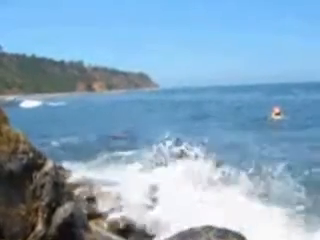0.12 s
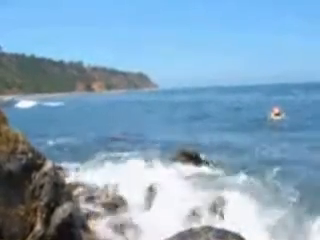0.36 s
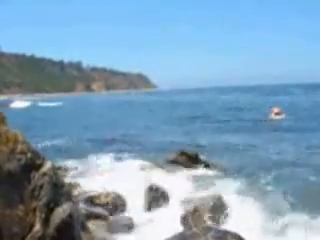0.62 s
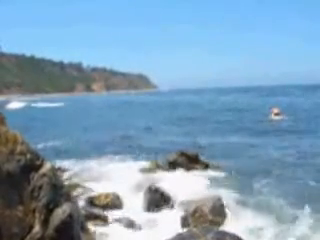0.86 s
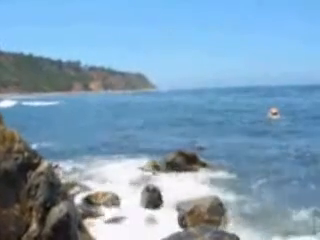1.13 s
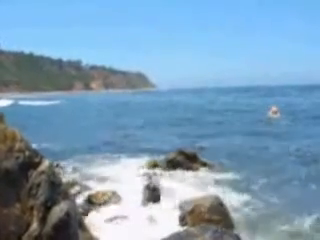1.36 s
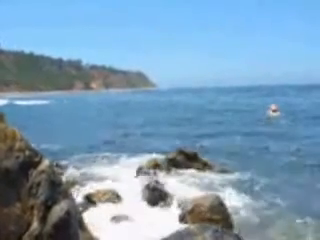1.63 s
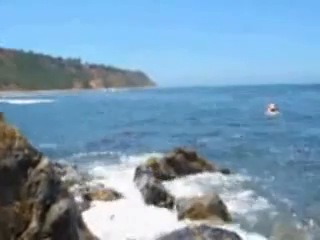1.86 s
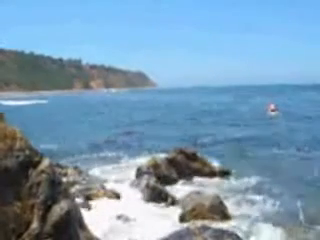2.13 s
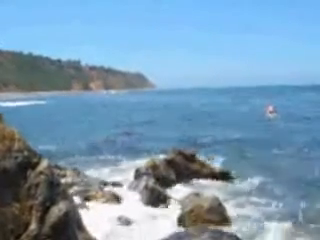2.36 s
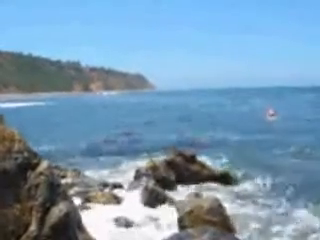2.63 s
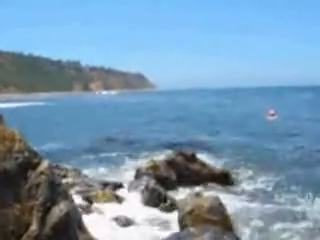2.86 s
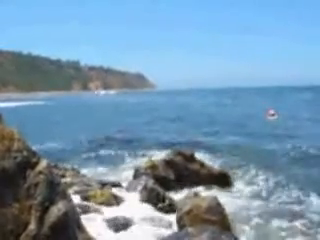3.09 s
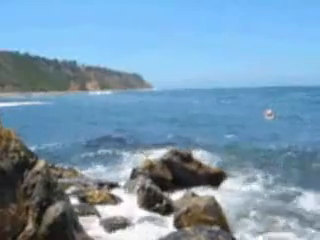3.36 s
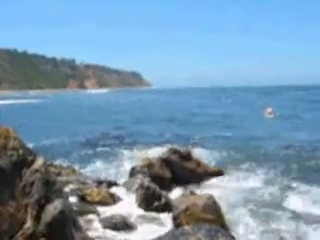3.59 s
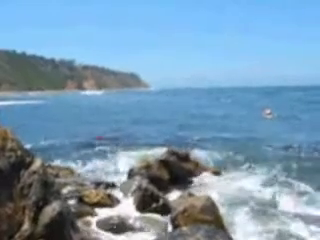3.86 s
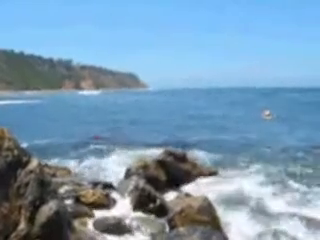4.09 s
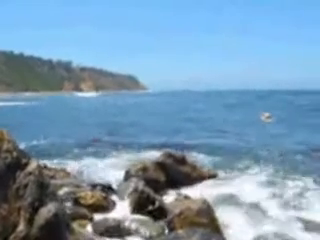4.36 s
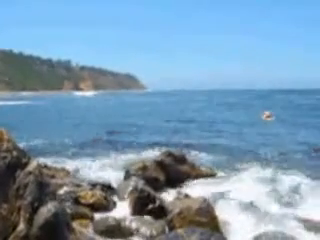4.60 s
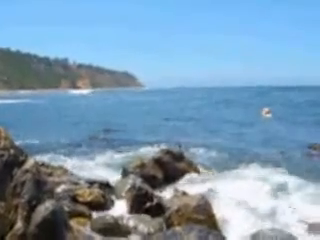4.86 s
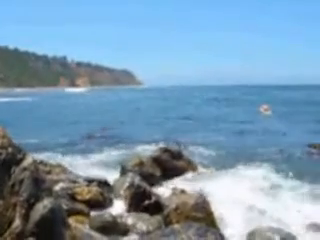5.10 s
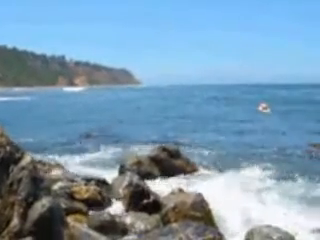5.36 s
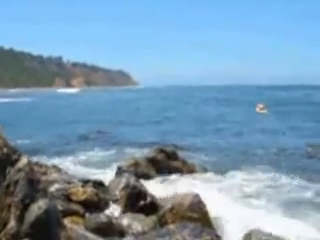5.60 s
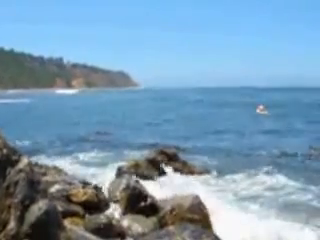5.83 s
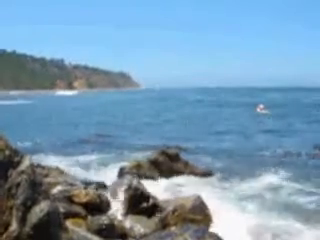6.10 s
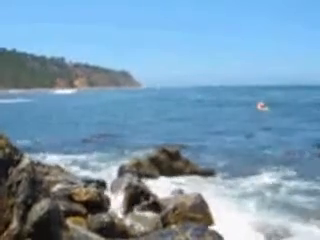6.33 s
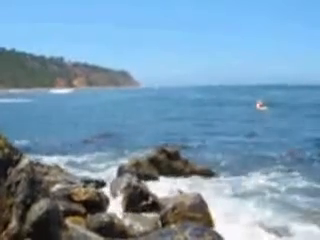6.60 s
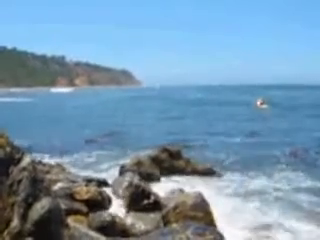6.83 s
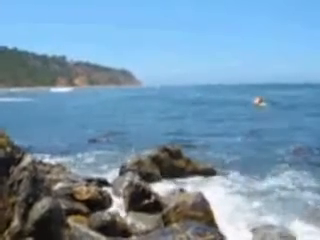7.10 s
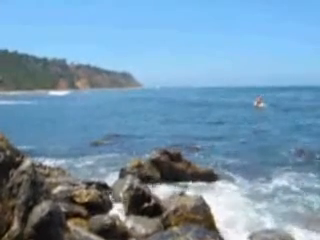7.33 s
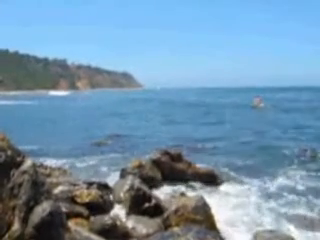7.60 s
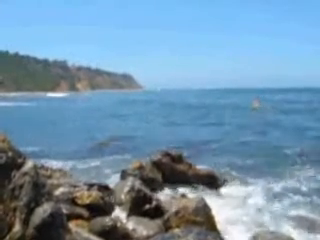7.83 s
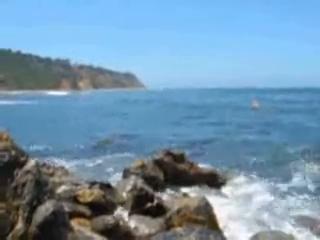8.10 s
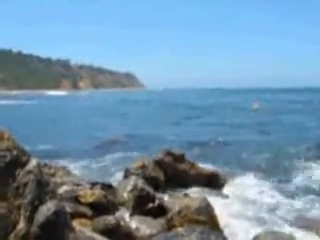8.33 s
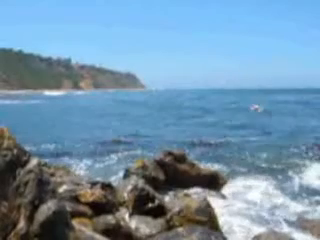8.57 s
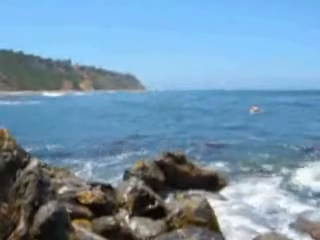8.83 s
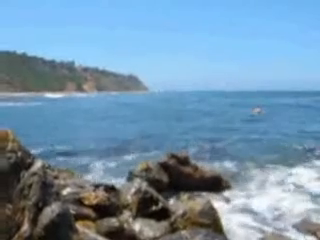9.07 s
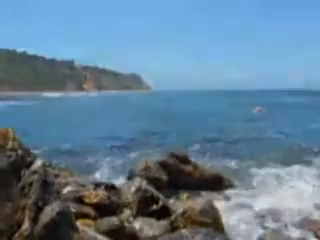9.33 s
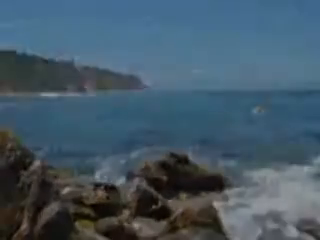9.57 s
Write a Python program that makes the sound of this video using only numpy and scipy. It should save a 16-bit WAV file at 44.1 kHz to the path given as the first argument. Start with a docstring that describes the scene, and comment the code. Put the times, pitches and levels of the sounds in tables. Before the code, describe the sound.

A wave is already crashing over rocks a few metres away, a dense continuous roar with deep rumble, thudding bubbles and bright spray strongest around 0.2 to 0.5 s. Low gulps of trapped air bubble through the first 1.7 s. At about 2.0 to 2.4 s a cluster of heavy, plunging gulps and wind thumps stands out, with the strongest buffets on the microphone. The wash then falls back, surging unevenly from 2.5 to 4.5 s with hollow slaps on rock, notably near 2.55 and 4.2 s. It thins around 5 s, gulps and swells briefly near 5.9 to 6.4 s, then is quietest around 6.7 to 7 s. From 7.5 s foam and roar gradually return, fuller near 8.6 s with soft gulps and little slaps, and keep washing to the end at about 9.7 s. Light wind flutters low throughout; mono, dull treble, faint hiss.

```python
"""Surf breaks over rocks a few metres away, runs in, drains and surges again: five clouds of ringing bubbles
make its thud, rumble, roar, foam and spray. Hollows and channels hum as filtered noise, and shaped low noise
is the light wind buffeting the microphone. Short swelling tones are gulps of trapped air and, at the lowest
pitches, thumps of wind on the microphone; short rings with noisy droplets are water slapping rock.
A small mono recorder bends the wave, cuts the top near 5.3 kHz, adds hiss, faint whine and drifting offset."""
import sys
import numpy as np
from scipy import signal
from scipy.fft import rfft, irfft, next_fast_len
from scipy.io import wavfile

SR = 44100
rng = np.random.default_rng(int(sys.argv[2]) if len(sys.argv) > 2 else 0)


def digitize_waveform(pressure):
    """Quantize a signal to 16-bit integers and store it at the path in sys.argv[1].

    Rows of a 2-D input are taken as channels; values are limited to [-1, 1].
    """
    field = np.atleast_2d(pressure).T
    bounded = np.clip(field, -1, 1)
    quanta = np.round(bounded * 32767).astype(np.int16)
    wavfile.write(sys.argv[1], SR, quanta)


def field_ratio(decibels):
    """Amplitude ratio for a level in dB (20 dB per decade); scalars and array-likes work."""
    return 10 ** (np.asarray(decibels, dtype=float) / 20)


N = 427769

# white water: (time [s], bubble roar level [dB], spray against the roar [dB])
WHITE_WATER = [(0.0, -27.5, -6.5), (0.19, -26.5, -6), (0.35, -26, -4.5), (.7, -27, -7), (1.0, -27.5, -8.5),
               (1.59, -27.5, -9), (2.13, -31.5, -8), (2.55, -30.5, -9), (2.8, -32, -6.5), (3.0, -32, -7.5),
               (3.2, -29, -9.5), (3.4, -30.5, -6.5), (3.62, -29, -7), (3.94, -30.5, -6), (4.32, -31, -6),
               (4.75, -33.5, -5), (5.2, -33.5, -5.5), (5.7, -33.5, -5), (5.97, -30, -8.5),
               (6.18, -34, -6.5), (6.4, -31, -9), (6.65, -37.5, -5), (6.9, -36, -7), (7.13, -37, -7.5),
               (7.7, -33.5, -8.5), (8.15, -33, -7), (8.4, -31.5, -6), (8.65, -29.5, -7),
               (8.95, -30.5, -8.5), (9.2, -31.5, -7), (9.7, -32.5, -7.5)]
# heave of the water below: (time [s], rumble level [dB], thud against the rumble [dB])
HEAVE = [(0.0, -28.5, -5), (.7, -28, -5), (1.6, -31, -7.5), (2.1, -32, -10), (2.6, -36, -4.5),
         (3.0, -33, -7), (3.3, -36.5, -9), (3.75, -33.5, -5), (4.1, -35, -7), (4.4, -35.5, -3.5),
         (4.95, -38, 0), (5.6, -36.5, -11), (5.9, -33.5, -12.5), (6.4, -36.5, -3), (6.85, -38, -7.5),
         (7.5, -38, -6.5), (8.0, -39, -5), (8.5, -36, -9.5), (9.0, -36, -12), (9.7, -39, -15)]
# bubble colours, big air pockets to fine spray: (frequency [Hz], density [dB per Hz])
THUD_COLOUR = [(53, -26), (85, -2), (105, 2.5), (135, 2), (200, -3), (260, -41), (440, -120)]
RUMBLE_COLOUR = [(120, -39), (200, -2), (237, 1.5), (312, 1), (366, -1), (450, -1.5), (580, -25.5),
                 (990, -120)]
ROAR_COLOUR = [(260, -35), (450, -1.5), (560, 0.5), (760, 0.5), (900, 0.5), (1080, -2), (1250, -6),
               (1420, -10.5), (1800, -33), (3080, -120)]
FOAM_COLOUR = [(820, -35), (1350, -1), (1770, -3), (2250, -2), (2550, -3), (2750, -4), (3000, -10.5),
               (3900, -37), (6600, -120)]
SPRAY_COLOUR = [(1760, -38), (3000, -2), (4600, -2.5), (5100, -6), (5500, -6.5), (5900, -2.5),
                (7020, -39.5), (11900, -120)]
# hollows among the rocks that the water sets humming:
# (frequency [Hz], width of one filter pass [Hz], mean level [dB], share of the rumble's swing [ratio])
HUMMING_HOLLOWS = [(174, 42, -40, 0.81), (240, 39, -43, 0.99), (373, 73, -41, 1.05)]
# rock channels ringing with the roar, low then high: (frequency [Hz], width of one filter pass [Hz])
ROCK_CHANNELS = [(766, 125), (2530, 330)]
# how strongly they ring: (time [s], low channel against the roar [dB], high channel against the roar [dB])
CHANNEL_LEVELS = [(0, -12.5, -22), (1, -11, -22), (2.2, -14, -20), (2.58, -8, -19), (2.85, -15, -19),
                  (3.17, -6.5, -19), (3.4, -13.5, -18.5), (3.65, -5.5, -19), (3.85, -14, -18),
                  (4.3, -10, -18), (5, -11, -16.5), (6, -9.5, -15.5), (7, -12.5, -16.5), (8.2, -12, -14),
                  (8.6, -9.5, -12.5), (8.9, -9, -13.5), (9.1, -12, -15.5), (9.35, -8.5, -14.5),
                  (9.7, -12, -15)]
# breeze on the microphone: (time [s], level [dB])
BREEZE_LEVELS = [(0, -42), (.6, -38), (1.1, -40.5), (1.5, -42.5), (1.75, -42), (2.4, -38), (3.1, -44),
                 (3.7, -40), (4.3, -39), (5.2, -40.5), (5.8, -43.5), (6.4, -43), (6.9, -46.5), (7.6, -40),
                 (8.5, -44), (9.2, -40.5), (9.7, -47)]
# colour of the breeze: (frequency [Hz], density [dB per Hz])
BREEZE_COLOUR = [(13, -31), (22, -6), (32, 0), (60, 1.5), (90, -2.5), (130, -13), (200, -48.5), (300, -120)]
# strong buffets of wind: (time [s], level at the crest [dB], length scale of the rise [s])
WIND_BUFFETS = [(.54, -44, 0.054), (1.7, -36.5, .07), (2.05, -30, 0.1), (2.369, -28, 0.05),
                (2.493, -37, .04), (3.297, -39, 0.07), (3.903, -32.5, .06), (4.077, -34, 0.049),
                (4.45, -34, 0.08), (4.7, -41.5, .1), (5.465, -37, 0.039), (6.407, -39.5, 0.07),
                (7.907, -42, .07), (9.2, -41, .1)]
# colour of a buffet, darker than the breeze: (frequency [Hz], density [dB per Hz])
BUFFET_COLOUR = [(13, -25), (25, -4), (45, -1), (70, -4), (100, -6.5), (140, -29), (250, -120)]
# gulps of trapped air, and in the lowest rows short thumps of wind on the microphone:
# (time of the crest [s], peak level [dB], pitch [Hz], length of the rise [s])
GULPS_AND_THUMPS = [(0.219, -20.5, 223, 0.042), (.265, -25, 168, 0.051), (.46, -20, 218, 0.045),
                    (0.549, -20.5, 385, .04), (.65, -25.5, 173, 0.066), (1.079, -24.5, 250, 0.036),
                    (1.18, -27, 176, 0.045), (1.35, -21, 187, 0.027), (8.326, -29.5, 270, 0.046),
                    (8.462, -26.5, 227, 0.047), (8.848, -28.5, 234, 0.059), (.57, -24.5, 174, 0.079),
                    (.71, -21, 174, 0.085), (1.421, -20, 371, 0.055), (1.486, -22.5, 370, 0.053),
                    (1.63, -24, 180, 0.038), (1.735, -18.5, 185, 0.04), (2.028, -18.5, 238, 0.024),
                    (2.061, -14, 96, 0.022), (2.08, -15.5, 256, 0.024), (2.132, -13, 246, 0.024),
                    (2.184, -16.5, 240, 0.022), (2.284, -21, 252, 0.018), (3.664, -22, 247, 0.037),
                    (3.713, -25, 260, 0.038), (3.851, -20, 109, 0.034), (3.915, -22, 118, 0.035),
                    (5.875, -27, 201, 0.028), (5.944, -21, 200, 0.014), (0.524, -23, 95, .02),
                    (0.818, -25, 120, .03), (.847, -21.5, 85, 0.023), (.965, -25, 60, .035),
                    (2.742, -24, 55, .028), (2.816, -23.5, 263, 0.027), (3.378, -26, 248, 0.027),
                    (3.47, -21.5, 55, .028), (3.686, -25, 80, 0.018), (4.277, -25, 55, 0.037),
                    (4.479, -26, 70, 0.045), (4.8, -28, 230, .03), (4.882, -23, 50, .03),
                    (9.013, -27.5, 90, .03), (9.183, -29, 65, .025)]
# water slapping rock: (time [s], level before the envelopes [dB], pitch [Hz], droplets against the ring [dB])
ROCK_SLAPS = [(.499, -20, 924, -13), (2.548, -13.5, 690, -17), (.81, -17, 740, -11.5),
              (1.782, -27, 3200, 5.5), (2.284, -28, 2490, 3.5), (2.607, -19.5, 840, -14),
              (2.926, -18, 730, -12.5), (5.793, -20, 1000, -10), (6.008, -23.5, 760, -12.5),
              (6.917, -24.5, 790, -11.5), (7.048, -30.5, 2730, 2.5), (7.748, -30, 2460, 1.5),
              (4.173, -14, 1034, -7), (4.221, -20, 795, -13), (6.037, -25, 2600, 4), (6.342, -17, 917, -3),
              (6.394, -21, 750, -8), (6.679, -31, 735, -1.5), (8.376, -30, 2150, 1), (8.579, -27, 2690, 2),
              (8.733, -21, 750, -13.5), (8.891, -20, 757, -10), (9.0, -30.5, 2560, 0.5)]
# converter offset: (time [s], offset [full scale])
CONVERTER_OFFSET = [(0, -.031), (.75, -.0347), (1.25, -.0428), (1.75, -.0497), (2.25, -.0503),
                    (3.25, -.0551), (9.2, -.056), (9.7, -.036)]

FOAM_DB, FOAM_FOLLOWS_SPRAY = -2, 0.53  # foam against the roar; share of the spray's relative level added
HUM_WAVER_DB, HUM_WAVER_HZ = 1.5, 4  # each hum swells and fades at random
CHANNEL_WAVER_DB, CHANNEL_WAVER_HZ = 1.9, 2.4
FLUTTER_DB, FLUTTER_HZ = 2.5, 7.5  # small random swells of the breeze
BUFFET_TAIL, PULSE_TAIL = 1.4, 1.24  # buffets; gulps and thumps: each dies this many times slower than it rises
LOPSIDED = 0.35  # share of the square that squeezes upward swings and stretches downward ones
CUT_HZ = 5320
HISS_DB = -57
WHINE_HZ, WHINE_DB = 8880, -84


def rms_one(x):
    """Scale to unit rms."""
    return x / np.sqrt(np.mean(x ** 2) + 1e-20)


def in_time(rows):
    """Columns of a table joined by straight lines, one value a sample."""
    s, *columns = np.transpose(rows)
    return [np.interp(np.arange(N) / SR, s, column) for column in columns]


def coloured(x, spectrum):
    """Shape a signal by a colour table, to unit rms."""
    size = next_fast_len(N)
    hz = np.maximum(np.arange(size // 2 + 1) * SR / size, 1)
    at, db = np.transpose(spectrum)
    gain = field_ratio(np.interp(np.log(hz), np.log(at), db))
    return rms_one(irfft(rfft(x, size) * gain, size)[:N])


def drift(corner_hz):
    """Slow chance: noise twice through a one-pole low-pass, unit rms."""
    # drawn at every 40th sample; the first 2000 values let the filter settle
    r = np.exp(-80 * np.pi * corner_hz / SR)
    noise = rng.standard_normal(N // 40 + 2002)
    slow = rms_one(signal.lfilter([1], [1, -2 * r, r * r], noise)[2000:])
    return np.interp(np.arange(N) / 40, np.arange(len(slow)), slow)


def ring(clicks, hz, cycles):
    """Clicks set a sine ringing that dies 60 dB in so many cycles."""
    r, w = field_ratio(-60 * hz / (cycles * SR)), 2 * np.pi * hz / SR
    return signal.lfilter([0, np.sin(w)], [1, -2 * r * np.cos(w), r * r], clicks + 1e-18)


def bubble_cloud(spectrum, per_s, cycles, spread_db, patchy_db, surge_db, count):
    """Bubbles of many sizes are born at random and ring; each size comes in patches of its own."""
    births = (rng.random(N) < per_s / SR) * rng.choice([-1, 1], N)
    clicks = births * field_ratio(spread_db * np.minimum(rng.exponential(1, N), 5))
    size_of = rng.integers(0, count, N)
    cloud = np.zeros(N)
    for k, hz in enumerate(np.geomspace(spectrum[1][0], spectrum[-2][0], count)):
        ringing = rms_one(ring(clicks * (size_of == k), hz, cycles))
        patches = field_ratio(patchy_db * drift(6.9))
        # equal power per Hz before colouring: log-spaced sizes thin out upwards
        cloud += np.sqrt(hz) * patches * ringing
    return field_ratio(surge_db) * coloured(cloud, spectrum)


def surf():
    """Five bubble populations from big air pockets to fine spray; churning water swells them together."""
    rumble_db, thud_db = in_time(HEAVE)
    roar_db, spray_db = in_time(WHITE_WATER)
    foam_db = roar_db + FOAM_DB + FOAM_FOLLOWS_SPRAY * spray_db
    churn = drift(9.3)
    # births per second, cycles of ring, spread of strength [dB], patchiness [dB], level [dB]
    thud = bubble_cloud(THUD_COLOUR, 2500, 12.3, 2.06, 0.99, rumble_db + thud_db + 0.74 * churn, count=6)
    rumble = bubble_cloud(RUMBLE_COLOUR, 4000, 6.1, 2.27, 1.0, rumble_db + 0.3 * churn, count=8)
    roar = bubble_cloud(ROAR_COLOUR, 8000, 10.1, 2.2, 0.7, roar_db + 0.35 * churn, count=12)
    foam = bubble_cloud(FOAM_COLOUR, 14000, 9.8, 2.4, 1.0, foam_db + 0.37 * churn, count=8)
    spray = bubble_cloud(SPRAY_COLOUR, 20000, 11.2, 2.76, 1.1, roar_db + spray_db + 0.55 * churn, count=8)
    return thud + rumble + roar + foam + spray


def resonant_noise(hz, width):
    """Noise twice through one resonance, to unit rms."""
    r = np.exp(-np.pi * width / SR)
    poles = [1, -2 * r * np.cos(2 * np.pi * hz / SR), r * r]
    once = signal.lfilter([1, 0, -1], poles, rng.standard_normal(N))
    return rms_one(signal.lfilter([1, 0, -1], poles, once))


def hollows():
    """Turbulence makes each hollow hum with the heave of the water, more or less closely."""
    rumble_db = in_time(HEAVE)[0]
    swing_db = rumble_db - rumble_db.mean()
    out = np.zeros(N)
    for hz, width, mean_db, share in HUMMING_HOLLOWS:
        level_db = mean_db + share * swing_db + HUM_WAVER_DB * drift(HUM_WAVER_HZ)
        out += field_ratio(level_db) * resonant_noise(hz, width)
    return out


def channels():
    """Turbulence rings each rock channel with the roar, wavering at random."""
    roar_db = in_time(WHITE_WATER)[0]
    out = np.zeros(N)
    for (hz, width), ringing_db in zip(ROCK_CHANNELS, in_time(CHANNEL_LEVELS)):
        level_db = roar_db + ringing_db + CHANNEL_WAVER_DB * drift(CHANNEL_WAVER_HZ)
        out += field_ratio(level_db) * resonant_noise(hz, width)
    return out


def breeze():
    """Lumpy, fluttering pressure on the diaphragm, as low noise."""
    level_db, = in_time(BREEZE_LEVELS)
    lumps = field_ratio(1.3 * drift(17.0))
    pressure = rms_one(lumps * coloured(rng.standard_normal(N), BREEZE_COLOUR))
    return field_ratio(level_db + FLUTTER_DB * drift(FLUTTER_HZ)) * pressure


def buffets():
    """Single shoves on the diaphragm: dark noise that rises fast and trails off."""
    t, out = np.arange(N) / SR, np.zeros(N)
    dark = coloured(rng.standard_normal(N), BUFFET_COLOUR)
    for s, db, length in WIND_BUFFETS:
        u = (t - s) / length
        bell = np.exp(-2 * np.where(u > 0, u / BUFFET_TAIL, u) ** 2)
        # give each shove the energy its bell calls for, whatever the noise does there
        even = np.sqrt(np.sum(bell ** 2) / np.sum((bell * dark) ** 2))
        out += field_ratio(db) * bell * dark * even
    return out


def gulps_and_thumps():
    """Each gulp of air or thump of wind swells into a cycle or more of tone and dies away."""
    t, out = np.arange(N) / SR, np.zeros(N)
    for s, db, hz, length in GULPS_AND_THUMPS:
        near = slice(round((s - length) * SR), round((s + PULSE_TAIL * length) * SR))
        u = t[near] - s
        stretched = np.where(u > 0, u / PULSE_TAIL, u)
        bell = np.exp(-(2.8 * stretched / length) ** 2)
        out[near] += field_ratio(db) * bell * np.cos(2 * np.pi * hz * u)
    return out


def slaps():
    """Water on rock: a short hollow ring and a burst of noise for the droplets."""
    out, u = np.zeros(N), np.arange(2000) / SR
    attack = np.minimum(u / 0.0009, 1)
    for s, db, hz, drops_db in ROCK_SLAPS:
        hollow = np.sin(2 * np.pi * hz * u) * np.exp(-u / 0.0041)
        droplets = field_ratio(drops_db) * rng.standard_normal(len(u)) * np.exp(-u / 0.0035)
        i = round(s * SR)
        out[i:i + len(u)] += field_ratio(db) * attack * (hollow + droplets)
    return out


def scene():
    """Water and wind at one microphone."""
    washing = surf() + hollows() + channels()
    wind = breeze() + buffets()
    return (washing + wind + gulps_and_thumps() + slaps())[None]


def preamp(dry):
    """A square term makes the swings lopsided; its mean is taken out."""
    return dry - LOPSIDED * (dry ** 2 - np.mean(dry ** 2))


def converter_hiss():
    """Noise with a steep cut near 10 kHz that droops towards the top."""
    cut = signal.ellip(14, 0.5, 70, 9980, fs=SR, output="sos")
    hiss = signal.sosfilt(cut, rng.standard_normal(N))
    return field_ratio(HISS_DB) * rms_one(signal.lfilter([1, 0.45], [1], hiss))


def converter_whine():
    """A faint steady sine, its level set as rms."""
    return np.sqrt(2) * field_ratio(WHINE_DB) * np.sin(2 * np.pi * WHINE_HZ * np.arange(N) / SR)


def roll_off(x):
    """The treble ends steeply here."""
    return signal.sosfilt(signal.butter(12, 10230, fs=SR, output="sos"), x)


def record(dry):
    """Lopsided preamp and anti-alias cut, then converter hiss, whine and offset."""
    anti_alias = signal.cheby1(8, 0.3, CUT_HZ, fs=SR, output="sos")
    sound = signal.sosfilt(anti_alias, preamp(dry))
    offset, = in_time(CONVERTER_OFFSET)
    mix = sound + converter_hiss() + converter_whine() + offset
    return roll_off(mix)


dry = scene()
out = record(dry)
digitize_waveform(out)
```